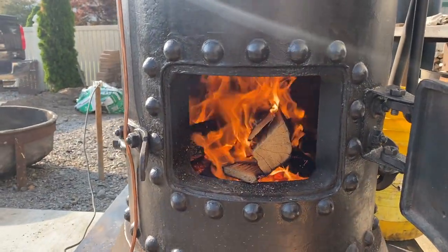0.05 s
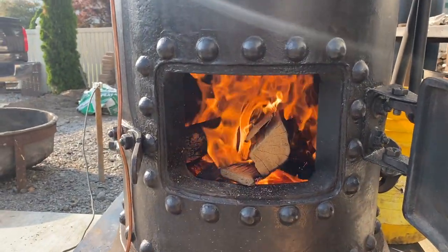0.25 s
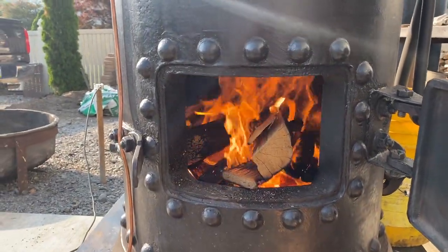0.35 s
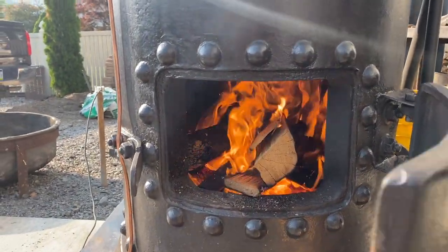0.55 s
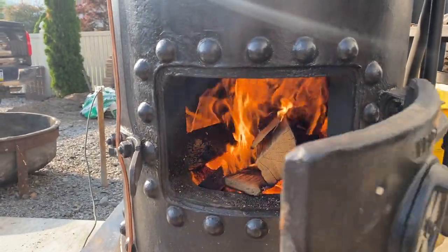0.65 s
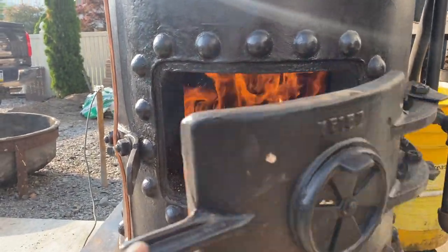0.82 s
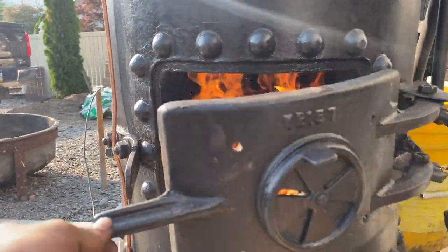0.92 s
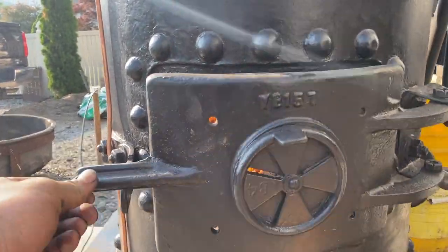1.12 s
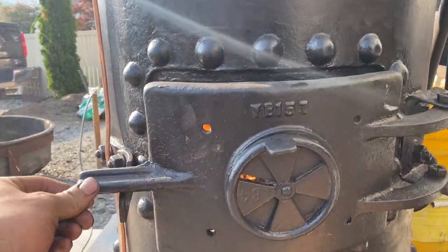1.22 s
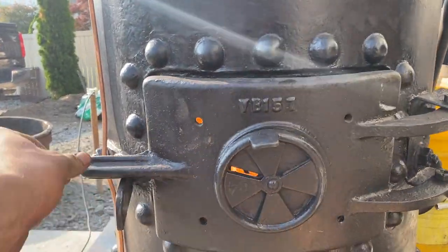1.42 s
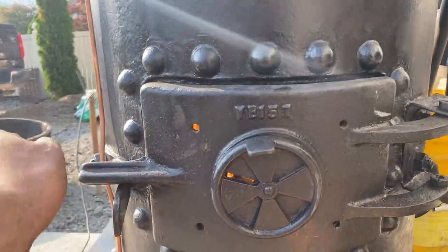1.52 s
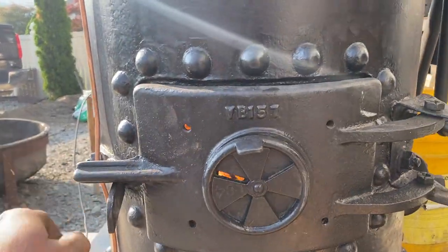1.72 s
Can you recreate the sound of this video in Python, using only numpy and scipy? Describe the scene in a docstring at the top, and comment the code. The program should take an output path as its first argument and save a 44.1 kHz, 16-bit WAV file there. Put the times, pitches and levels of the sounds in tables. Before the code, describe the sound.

A heavy cast-iron door clanks shut and latches over a low, crackling wood fire.

```python
"""Shutting a wood boiler's fire door

Outdoors a fire rumbles, puffs and pops while small birds chirp far off. The cast-iron door meets its
frame, the latch clicks, the door clangs home and the handle grinds into its catch. Impacts and friction
excite the iron's damped modes; each push from flames or door makes the air in the firebox boom."""
import sys
import numpy as np
from scipy import signal
from scipy.fft import rfft, irfft, next_fast_len
from scipy.io import wavfile

SR = 44100
rng = np.random.default_rng(int(sys.argv[2]) if len(sys.argv) > 2 else 0)


def wrap_up_sound(samples):
    """Save the sound to the file named by the first command line argument, as 16-bit audio."""
    columns = np.atleast_2d(samples).T
    # keep every value between -1 and 1, then stretch to whole-number steps
    tamed = np.clip(columns, -1, 1)
    steps = np.round(tamed * 32767).astype(np.int16)
    wavfile.write(sys.argv[1], SR, steps)


N = 77175
TIME = np.arange(N) / SR


def from_db(db):
    """Amplitude ratio of a level: tenfold for every 20 dB."""
    return 10 ** (np.asarray(db) / 20)


def at_hz(points, hz):
    """Interpolation of a table on a logarithmic frequency axis."""
    f, value = np.transpose(points)
    return np.interp(np.log(hz), np.log(f), value)


def unit_rms(x):
    """Normalisation to unit mean power."""
    return x / np.sqrt(np.mean(x ** 2) + 1e-20)


def decay(t, t60):
    """Damping: an exponential fall of 60 dB in t60 seconds."""
    return np.exp(-np.log(1000) * t / t60)


def add(out, onset, x):
    """Superposition of x on out from an onset in seconds."""
    i = max(int(onset * SR), 0)
    out[..., i:i + x.shape[-1]] += x[..., :N - i]


# Likeness of the left and right sound pressure: (frequency [Hz], coherence [ratio])
COHERENCE = [(40, 0.75), (110, .96), (300, 0.87), (600, 0.67), (1000, 0.3), (2400, 0.44), (5500, 0.37),
             (7500, 0.91), (15000, 0.79)]

def noise(spectrum, tilt_db=0, size=16384, ripple_db=0, ripple_hz=99.24):
    """Partially coherent stereo noise of unit rms, tilted by tilt_db per octave above 700 Hz."""
    hz = np.maximum(np.arange(size // 2 + 1) * SR / size, 1)
    mid, side = np.exp(2j * np.pi * rng.random((2, len(hz))))
    coherence = np.clip(at_hz(COHERENCE, hz), -1, 1)
    stereo = np.sqrt(1 + coherence) * mid + np.sqrt(1 - coherence) * side * [[1], [-1]]
    colour_db = at_hz(spectrum, hz) + tilt_db * np.log2(np.maximum(hz, 700))
    resonances = np.interp(hz / ripple_hz, np.arange(size), rng.standard_normal(size))
    return unit_rms(irfft(from_db(colour_db + ripple_db * resonances) * stereo, size))


# Steady combustion noise: (frequency [Hz], relative spectral level [dB])
RUMBLE_SPECTRUM = [(25, -32), (45, -21), (70, -0.5), (105, 4), (170, -9), (260, -13.5), (380, -25.5),
                   (700, -31.5), (2000, -48.5)]

def fire_rumble(roar_hz=55, shut_s=0.78, closing_s=0.035):
    """Combustion radiates low-frequency noise; the deepest roar escapes only while the door is open."""
    rumble = noise(RUMBLE_SPECTRUM, size=N)
    roar = noise([(roar_hz / 2, -30), (roar_hz, 0), (roar_hz * 2, -20), (roar_hz * 10, -90)], size=N)
    opening = np.clip((shut_s - TIME) / closing_s, 0, 1)
    return from_db(-35.5) * rumble + from_db(-38.5) * roar * opening


# Outdoor background: (frequency [Hz], relative spectral level [dB])
YARD_SPECTRUM = [(100, 2), (600, 0.5), (1100, -2.5), (2000, -7), (4000, -10), (7000, -16.5), (11000, -18.5),
                 (15500, -14.5)]

def yard_hiss():
    """Stationary broadband noise forms a faint ambient floor."""
    return from_db(-53) * noise(YARD_SPECTRUM, size=N)


def crack(spectrum, tilt_db, t60, tail_db, tail_t60, rise_s=0.00058):
    """Modal overlap: an impulse excites modes so dense that they decay as noise, with a duller tail."""
    burst = noise(spectrum, tilt_db, ripple_db=2)
    tail = noise(spectrum, tilt_db - 3, ripple_db=2)
    t = TIME[:burst.shape[1]]
    attack = np.minimum(t / rise_s, 1)
    return attack * (burst * decay(t, t60) + from_db(tail_db) * tail * decay(t, tail_t60))


# Pops of the logs: (time [s], level [dB], tilt [dB/octave])
WOOD_POPS = [(0.0735, -27, 5), (0.184, -36.5, 14), (0.222, -38.5, -7.5), (0.417, -36.5, -0.5),
             (0.4537, -38, -1), (0.490, -49.5, 3), (0.6685, -7, -2), (0.7304, -26, 2.5), (0.845, -38, -1),
             (0.967, -48, 7)]
# Colour of a pop: (frequency [Hz], relative spectral level [dB])
WOOD_SPECTRUM = [(200, -6), (420, -13.5), (550, -20), (750, 0), (1100, -2), (1500, 0.5), (2100, 4),
                 (2900, -3.5), (3800, 0), (5000, -5), (7200, -2.5), (8500, -5.5), (11000, -7.5),
                 (15000, -21)]

def wood_pops():
    """Impulsive excitation: burning wood gives brief, heavily damped cracks."""
    out = np.zeros((2, N))
    for onset, db, tilt_db in WOOD_POPS:
        pop = crack(WOOD_SPECTRUM, tilt_db, t60=0.025, tail_db=-15.5, tail_t60=0.091)
        add(out, onset, from_db(db) * pop)
    return out


def drift(rate_hz, count=400):
    """Random modulation: Gaussian values at rate_hz, joined by straight lines."""
    return np.interp(TIME * rate_hz, np.arange(count), rng.standard_normal(count))


# Distant calls: (time [s], duration [s], start frequency [Hz], end frequency [Hz], level [dB])
BIRD_CHIRPS = [(0.111, 0.058, 3310, 4100, -52), (0.251, .032, 3350, 3270, -45),
               (0.297, 0.015, 3420, 3230, -47.5), (0.408, 0.031, 2716, 3684, -44),
               (0.55, 0.11, 2774, 2235, -54), (0.786, 0.076, 2190, 3820, -50),
               (1.484, 0.059, 2350, 2780, -56), (1.626, .04, 3300, 3800, -60)]

def birds(warble_depth=0.0264, flutter_db=4.5, blur_hz=170.1, echo_db=-3):
    """Frequency-modulated whistles, broadened by scattering and prolonged by the yard's reverberation."""
    song = np.zeros(N)
    warble = 1 + warble_depth * drift(120)
    for onset, duration, start_hz, end_hz, db in BIRD_CHIRPS:
        progress = np.clip((TIME - onset) / duration, 0, 1)
        hz = (start_hz + (end_hz - start_hz) * progress) * warble
        envelope = np.sqrt(4 * progress * (1 - progress))
        song += from_db(db) * envelope * np.sin(2 * np.pi * np.cumsum(hz) / SR)
    song *= from_db(flutter_db * drift(60.2))
    song *= drift(blur_hz, count=N)  # sidebands widen each whistle
    response = rng.standard_normal((2, N)) * decay(TIME, t60=0.42)
    echo = signal.fftconvolve(song[None], response / np.linalg.norm(response[0]), axes=1)[:, :N]
    return song + from_db(echo_db) * echo


# Pushes of air from flames and door: (time [s], level [dB], frequency [Hz], rise [s], T60 [s])
AIR_PUSHES = [(0.242, -17, 147, 0.00074, 0.037), (0.403, -15.5, 96, 0.0043, 0.17),
              (0.440, -18, 123, .004, 0.12), (0.459, -8.5, 76.5, 0.0072, 0.13),
              (0.485, -14.5, 78, 0.0065, 0.11), (0.54, -23.5, 65, .015, 0.32),
              (0.668, -20.5, 55, 0.0036, 0.19), (0.686, -17, 114, 0.0052, 0.18),
              (0.755, -31, 262.6, 0.019, 0.23), (0.876, -5.5, 123.3, 0.0089, 0.12),
              (0.921, -16, 118.8, 0.0048, 0.24), (1.1, -20, 109, 0.0062, 0.19),
              (1.128, -17.5, 194.2, 0.01, 0.26), (1.14, -7.5, 149.7, 0.0101, 0.075),
              (1.156, -14, 97.5, 0.015, 0.18), (1.236, -9.5, 159, 0.0026, 0.045),
              (1.269, -16.5, 103.4, 0.018, 0.24), (1.36, -24, 101.9, 0.021, 0.36),
              (1.529, -27, 100.4, 0.0061, 0.32)]
# Turbulence in each push: (frequency [Hz], relative spectral level [dB])
PUFF_SPECTRUM = [(30, 9), (90, 5.5), (200, 5.5), (330, -13), (600, -20.5), (1500, -31), (5000, -53)]

def firebox_booms(puff_db=-7, puff_t60=0.069, low_cut_ratio=0.48):
    """Cavity resonance: each push sets the enclosed air in damped oscillation, with a turbulent puff."""
    out = np.zeros((2, N))
    for onset, db, hz, rise_s, t60 in AIR_PUSHES:
        turbulence = noise(PUFF_SPECTRUM)
        t = TIME[:turbulence.shape[1]]
        puff = from_db(puff_db) * turbulence * decay(t, puff_t60)
        tone = np.sin(2 * np.pi * hz * t) * decay(t, t60)
        swell = np.sin(np.pi / 2 * np.minimum(t / rise_s, 1)) ** 2
        low_cut = signal.butter(2, low_cut_ratio * hz, "high", fs=SR, output="sos")
        add(out, onset, from_db(db) * signal.sosfilt(low_cut, swell * (tone + puff)))
    return out


def ring(modes, tilt_db=0, scatter_db=1.5, pan_db=7):
    """Free vibration: a sum of damped sinusoids of alternating sign, varied in strength and direction."""
    hz, db, t60 = np.transpose(modes)[:, :, None]
    t = TIME[:16384]
    gain = from_db(db + tilt_db * np.log2(hz / hz.mean()) + scatter_db * rng.standard_normal(hz.shape))
    phase = np.pi * np.arange(len(hz))[:, None]
    waves = gain * decay(t, t60) * np.sin(2 * np.pi * hz * t + phase)
    pan = from_db(pan_db / 2 * rng.uniform(-0.92, 1, len(hz)) * [[1], [-1]])
    return pan @ waves


# Iron striking iron: (time [s], level [dB], tilt [dB/octave], relative ring level [dB])
DOOR_IMPACTS = [(0.8535, -26, 0, -5), (0.8588, -19, -0.5, -5.5), (0.874, -22.5, 0.5, -2),
                (0.8817, -23, 0, -10.5), (0.927, -40, -3, 0.5), (1.0251, -35.5, -3, -3),
                (1.039, -39, -4.5, 2), (1.120, -31, -5, -2.5), (1.133, -36.5, -12, -23),
                (1.1562, -30, -5, -3.5), (1.168, -37, -3, -3), (1.211, -31.5, -3, -4),
                (1.226, -24, -1, 5.5), (1.2303, -9.5, 1, 2), (1.2365, -14.5, 3.5, 3),
                (1.2407, -12, 4.5, -12), (1.306, -30.5, -1, -3), (1.32, -37, -4.5, -2),
                (1.3358, -35.5, -0.5, 6), (1.358, -30, -1, -3.5), (1.375, -23.5, -7, -28),
                (1.381, -30, -1.5, 2.5), (1.3888, -23, 1.5, -19), (1.398, -26, 0, -11),
                (1.434, -38, -5, -4.5), (1.456, -41, -3, -20)]
# The door's dense, short-lived modes: (frequency [Hz], relative spectral level [dB])
PLATE_SPECTRUM = [(200, -4.5), (420, -3.5), (750, -1), (1200, -1.5), (1700, 2.5), (2700, 2.5), (3200, 0),
                  (4200, 6), (5500, -2), (7300, -0.5), (8300, -3.5), (11000, -10.5), (15000, -30)]
# The door's resolved modes: (frequency [Hz], level [dB], T60 [s])
PLATE_MODES = [(476, -20, 0.092), (1466, -18, 0.057), (1600, -8.5, 0.048), (1713, -12, 0.11),
               (1920, -16, 0.093), (2077, -8, 0.098), (2210, -19.5, 0.23), (2715, -16, 0.074),
               (2844, -11, 0.13), (3475, -14.5, 0.086), (3960, -22, .18), (4253, -10, 0.15),
               (4360, -15.5, .12), (4850, -18, 0.11), (5960, -21, 0.069), (6768, -13, 0.063),
               (7030, -33, .16), (7600, -17, 0.037), (7963, -16, 0.073)]

def door_knocks():
    """Impact excitation of a plate: each knock gives a crack and a ring of the iron's distinct modes."""
    out = np.zeros((2, N))
    for onset, db, tilt_db, ring_db in DOOR_IMPACTS:
        body = crack(PLATE_SPECTRUM, tilt_db, t60=0.056, tail_db=-20.5, tail_t60=0.29)
        clang = from_db(ring_db) * ring(PLATE_MODES, tilt_db)
        add(out, onset, from_db(db) * (body + clang))
    return out


# Notes of the handle bar: (time [s], frequency [Hz], level [dB], T60 [s])
HANDLE_TONES = [(0.881, 4157, -33, 0.15), (1.084, 4160, -35.5, 0.31), (1.165, 2235, -30, 0.16),
                (1.239, 4136, -21.5, 0.16), (1.258, 2214, -32.5, 0.29)]

def handle_ring():
    """Free vibration of a bar: each time the handle catches, one lightly damped mode sings on."""
    out = np.zeros((2, N))
    for onset, hz, db, t60 in HANDLE_TONES:
        add(out, onset, ring([(hz, db, t60)]))
    return out


# Envelope of the handle rubbing over its catch: (time [s], level [dB])
FRICTION_ENVELOPE = [(1.02, -54), (1.045, -49), (1.07, -52), (1.10, -32.5), (1.18, -46), (1.205, -57),
                     (1.26, -34.5), (1.30, -37.5), (1.33, -60), (1.405, -41), (1.425, -71), (1.45, -51),
                     (1.48, -83)]

def handle_friction(slips_per_s=730, spread_db=4, grain_t60=0.0064, ring_db=-16.5):
    """Stick-slip friction: rough cast surfaces move in tiny random jerks that excite the door plate."""
    slips = (rng.random(N) < slips_per_s / SR) * rng.choice([-1, 1], N)
    strength = from_db(spread_db * np.minimum(rng.exponential(1, N), 4))
    grain = noise(PLATE_SPECTRUM, tilt_db=-4.5)
    grain *= decay(TIME[:grain.shape[1]], grain_t60)
    response = grain + from_db(ring_db) * ring(PLATE_MODES)
    grinding = signal.fftconvolve((slips * strength)[None], response, axes=1)[:, :N]
    level_db = np.interp(TIME, *np.transpose(FRICTION_ENVELOPE), left=-np.inf, right=-np.inf)
    return from_db(level_db) * unit_rms(grinding)


# The latch bar snapping against its catch: (time [s], level [dB], tilt [dB/octave])
LATCH_IMPACTS = [(1.0835, -11.5, -0.5)]
# The bar's dense modes: (frequency [Hz], relative spectral level [dB])
LATCH_SPECTRUM = [(200, -24), (1000, -7), (1700, 0), (3300, -4), (4200, 10), (5800, 0), (7200, -10),
                  (8300, -2), (11000, -7.5), (15000, -40)]
# The bar's resolved modes: (frequency [Hz], level [dB], T60 [s])
LATCH_BAR_MODES = [(2690, -4.5, 0.026), (4020, 4, 0.015), (7110, -6.5, 0.045), (10820, -17, 0.055),
                   (11140, -22.5, 0.067)]

def latch_click():
    """Impact excitation of a small bar: its high, quickly damped modes give a bright clink."""
    out = np.zeros((2, N))
    for onset, db, tilt_db in LATCH_IMPACTS:
        snap = crack(LATCH_SPECTRUM, tilt_db, t60=0.028, tail_db=-11.5, tail_t60=0.094)
        add(out, onset, from_db(db) * (snap + ring(LATCH_BAR_MODES)))
    return out


def scene():
    """Linear superposition: the pressures from ironwork, fire and yard add."""
    ironwork = door_knocks() + handle_ring() + latch_click() + handle_friction()
    fire = firebox_booms() + fire_rumble() + wood_pops()
    return ironwork + fire + birds() + yard_hiss()


# Response of both microphone ports: (frequency [Hz], gain [dB])
PORT_RESPONSE = [(30, 0.5), (8200, 0), (8800, -7.5), (9300, -4), (9900, 2), (12300, -1.5), (13300, -4),
                 (14200, -1), (16000, -12)]
# Balance between the ports: (frequency [Hz], left minus right [dB])
PORT_BALANCE = [(300, -0.54), (900, -1), (1800, 3), (3200, 2), (5500, 2.5), (7500, 0), (15000, 0)]

def record(dry, corner_hz=7110, lag_s=0.00025, cutoff_hz=16300):
    """Filtering and saturation: two ports colour the sound, peaks are rounded and the top is cut."""
    size = next_fast_len(2 * N)
    hz = np.maximum(np.arange(size // 2 + 1) * SR / size, 1)
    left_lag = np.exp(-2j * np.pi * lag_s * np.maximum(hz - corner_hz, 0) * [[1], [0]])
    gain = from_db(at_hz(PORT_RESPONSE, hz) + at_hz(PORT_BALANCE, hz) / 2 * [[1], [-1]])
    coloured = irfft(rfft(dry, size) * gain * left_lag, size)[:, :N]
    low_pass = signal.ellip(10, 0.1, 80, cutoff_hz, fs=SR, output="sos")
    return signal.sosfilt(low_pass, np.tanh(coloured))


dry = scene()
out = record(dry)
wrap_up_sound(out)
```